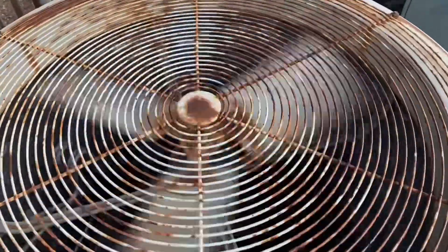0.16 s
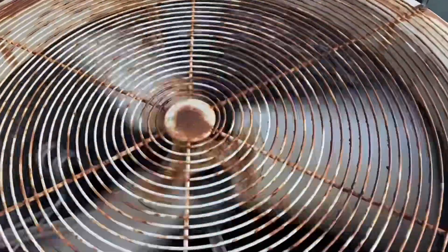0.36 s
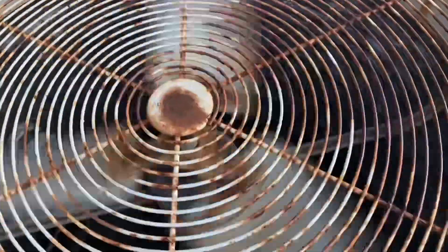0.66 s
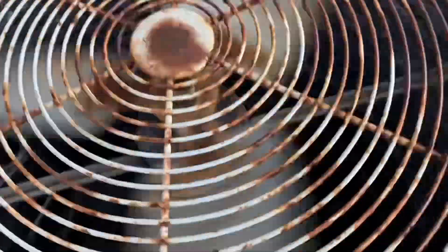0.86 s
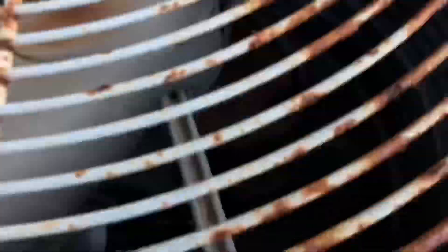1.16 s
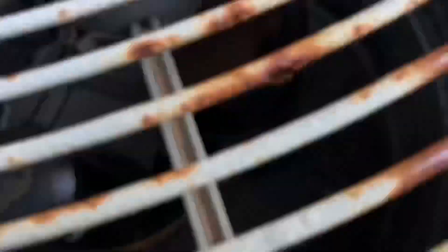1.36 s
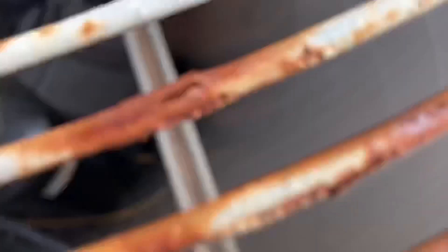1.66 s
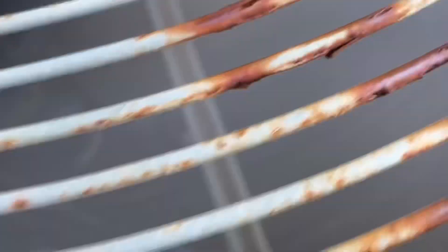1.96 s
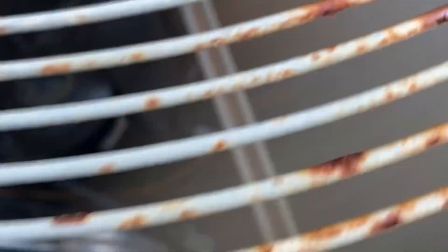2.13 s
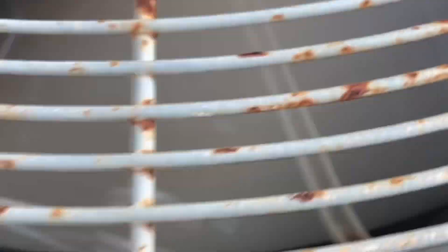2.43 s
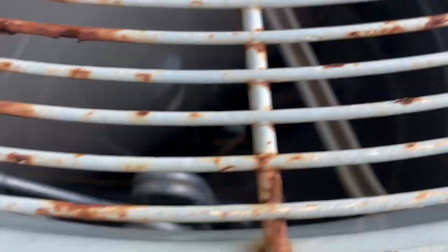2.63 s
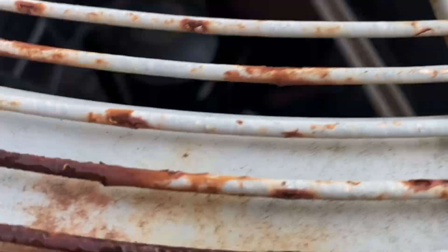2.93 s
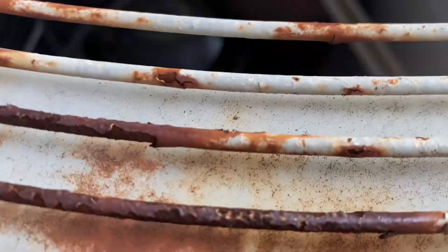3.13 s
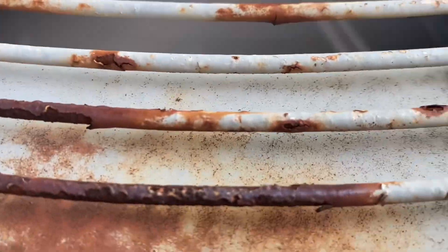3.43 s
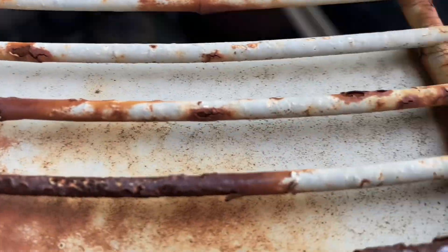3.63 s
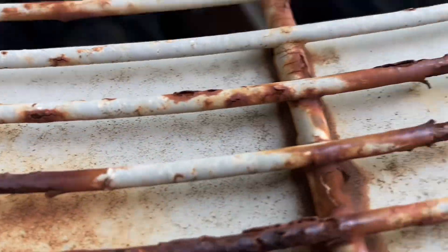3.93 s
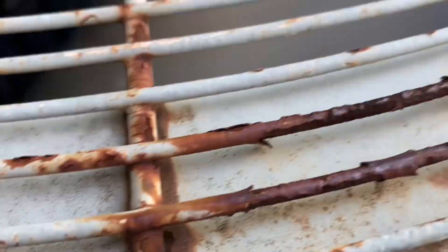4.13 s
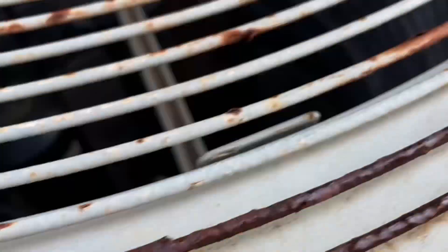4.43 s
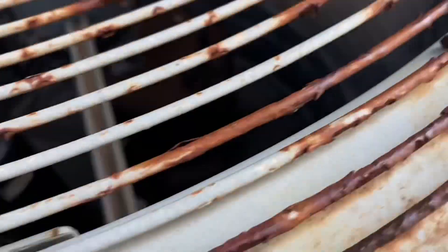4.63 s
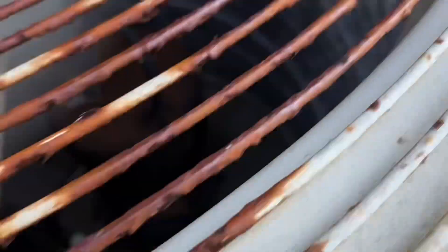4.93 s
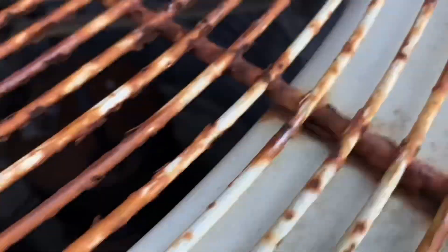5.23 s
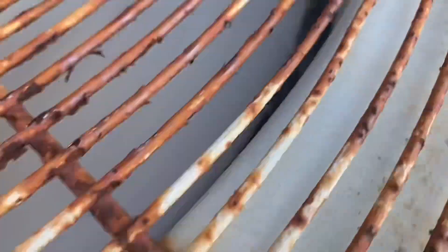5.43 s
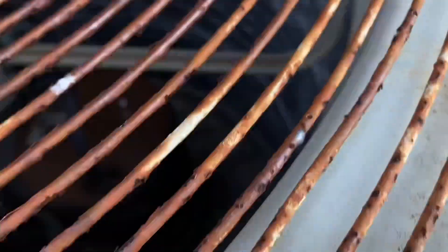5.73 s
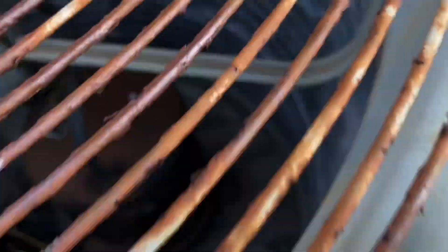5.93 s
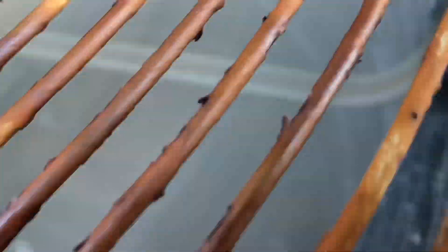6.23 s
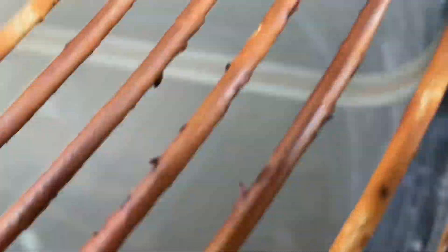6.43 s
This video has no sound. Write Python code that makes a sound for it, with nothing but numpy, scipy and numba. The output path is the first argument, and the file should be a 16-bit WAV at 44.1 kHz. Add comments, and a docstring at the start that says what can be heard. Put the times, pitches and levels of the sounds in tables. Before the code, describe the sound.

Steady heavy fan roar, fluttering rapidly as blades pass, the microphone descending to the grille amid low rumble, wind thumps and compressor hum.

```python
"""Outdoor condenser unit, close up

A phone with two microphone ports starts above the fan hub, comes down to the grille and moves along the rim.
Three blades turn a pressure wave past the ports: cosines at the blade-passing rate and two multiples.
Each passage trails a burst of turbulent wake, made of noise gated by the blade angle, with eddies after it.
The draught buffets, thumps and pops on the ports; air rushes through the grille and sounds through the casing.
Below, the compressor hums on a shaft order while gas hiss, valve rattle and whines come through its shell."""
import sys
import numpy as np
from scipy import signal
from scipy.fft import rfft, irfft, next_fast_len
from scipy.io import wavfile
from scipy.ndimage import uniform_filter1d, minimum_filter1d
from numba import njit

SR = 44100
rng = np.random.default_rng(int(sys.argv[2]) if len(sys.argv) > 2 else 0)


def generate_wav(sig):
    """Save sig (samples, or channels by samples) to the path in sys.argv[1] as 16-bit PCM at SR."""
    pcm = np.round(np.clip(np.atleast_2d(sig).T, -1, 1) * 32767).astype(np.int16)
    wavfile.write(sys.argv[1], SR, pcm)


N = 290619
PORTS = np.array([[0], [1]])  # rows: left, right


def undb(db):
    """Amplitude of a level in dB."""
    return 10 ** (np.asarray(db) / 20)


def unit(x):
    """Scale to rms 1."""
    return x / np.sqrt(np.mean(x ** 2))


def curves(table):
    """Columns of a table whose first column is time in s, one value a sample."""
    s, *columns = np.transpose(table)
    return [np.interp(np.arange(N) / SR, s, column) for column in columns]


def over_hz(table, hz):
    """A table read on a log-frequency axis."""
    table_hz, values = np.transpose(table)
    return np.interp(np.log(hz), np.log(table_hz), values)


@njit
def svf(x, hz, width):
    """State-variable band-pass, gain 1 at the centre."""
    y, band, low = np.empty(len(x)), 0., 0.
    g, k = np.tan(np.pi * hz / SR), width / hz
    for i in range(len(x)):
        v = (band + g * (x[i] - low)) / (1 + g * (g + k))
        band, low, y[i] = 2 * v - band, low + 2 * g * v, k * v
    return y


def walk(rate):
    """Random levels held 1 / rate s and slewed twice; spread near 1."""
    k = int(SR / rate)
    held = np.repeat(rng.standard_normal(N // k + 1), k)
    return 1.3 * uniform_filter1d(uniform_filter1d(held, k), k)[:N]


# how far the ports share a sound, by frequency: pitch_hz, share of the bass likeness
LIKENESS = [(60, 3.3), (400, 1.27), (1200, 1.06), (2400, 0.034), (4400, 1.23), (8000, 0.053), (15000, 0.23)]
AIR_ALIKE = .58  # bass likeness of the ports for sound that comes through the air, 0-1


def air(colour, alike, sway, count=1):
    """Two-port noise in slices of a spectrum, count to the octave; sway(hz) gains each slice; rms near 1."""
    size = next_fast_len(N, True)
    hz = np.maximum(np.arange(size // 2 + 1) * SR / size, 1)
    lowest, highest = np.array(colour)[[0, -1], 0]
    gain = undb(over_hz(colour, hz)) * (hz > .7 * lowest) * (hz < 1.4 * highest)
    gain = gain / np.sqrt(np.mean(gain ** 2))
    noise = rfft(rng.standard_normal((2, size))) * gain
    out = np.zeros((2, N))
    for centre in 31.25 * 2 ** np.arange(0, 10, 1 / count):
        if not lowest / 2 < centre < highest * 2:
            continue
        window = np.cos(np.pi / 2 * np.clip(count * np.log2(hz / centre), -1, 1)) ** 2
        shared = np.clip(alike * over_hz(LIKENESS, centre), 0, .98)
        # a common and an opposed part, balanced to give the likeness
        balance = np.sqrt([1 + shared, 1 - shared]).reshape(2, -1)
        mid, side = irfft(noise * window, size)[:, :N] * balance
        out += np.array([mid + side, mid - side]) * sway(centre) / np.sqrt(2)
    return out


# how the microphone comes down: start_s, nearness to the grille (0-1)
DESCENT = [(0, 0), (.5, 0.1), (.9, 0.5), (1.2, 0.83), (6.6, 1)]


def nearness():
    """Closeness of the microphone to the grille: 0 far above, 1 at it."""
    return np.clip(curves(DESCENT)[0], 0, 1)


# air heard along the microphone's way: start_s, wake_db, rush_db, air_left_minus_right_db,
# buffet_left_minus_right_db, wake_brightness_db_per_octave
AIR_ON_THE_WAY = [(0, -27.5, -22, 0.2, -0.5, 0.5), (.4, -24.5, -20, 0.7, -1, -0.5),
                  (1.0, -22, -17, 0.3, 1, -2), (1.35, -24.5, -21.5, 1.5, -1, 1.5),
                  (1.6, -23, -24.5, 0.5, 3, 0.7), (2.2, -30, -25, 2.5, 3, 0.5),
                  (2.8, -35.5, -28, 2.5, -1.5, -3), (3.4, -38, -26.5, 4, 1.5, -1),
                  (4.0, -39.5, -28, 3.5, -2, -8), (4.6, -36.5, -27.5, 4.5, -0.5, -6.5),
                  (5.2, -37, -30.5, 4.5, 0, 2), (5.7, -36.5, -25.5, 6, 0.5, -3),
                  (6.15, -33, -27.5, 4.5, -1, 4), (6.6, -29.5, -25.5, 5.5, -5, 3)]
WAKE_REF_DB = -30


def wake_level_db():
    """Strength of the blade wake where the microphone is."""
    return curves(AIR_ON_THE_WAY)[0]


def layer_db(layer):
    """Level of a layer from the microphone's nearness and the strength of the wake where it is."""
    far_db, near_db, per_wake = layer
    return far_db + nearness() * (near_db - far_db) + per_wake * (wake_level_db() - WAKE_REF_DB)


# where the microphone is round the hub: start_s, bearing_deg
BEARING = [(0, 25.2), (1.2, 23.5), (2.1, 5.4), (2.7, -12), (3.3, -21), (3.9, -17), (4.5, -5), (4.8, 15),
           (5.4, 38), (5.7, 47), (6.3, 56), (6.6, 57)]
BLADES, BLADE_HZ = 3, 41.1  # blade passages a second past a microphone at rest


def blade_angle():
    """Phase of the blade passages (radians), shifted as the microphone moves round the hub."""
    bearing, = curves(BEARING)
    return 2 * np.pi * BLADE_HZ * np.arange(N) / SR + BLADES * np.radians(bearing)


WAKE_LEAD = 1.3  # phase of the wake in a blade passage, radians
CHOP_WAKE_DB = (-40, -27)  # wake levels between which the chopping sets in


def chopped(angle, depth):
    """Gain of a sound that the blades cut across, most near the grille in a strong wake; rms 1."""
    depth = depth * nearness() * np.interp(wake_level_db(), CHOP_WAKE_DB, (0, 1))
    return np.exp(depth * np.cos(angle + WAKE_LEAD)) / np.sqrt(np.i0(2 * depth))


# compressor below: start_s, hum_db on the fifth shaft order, then ring_db of each of the five shell modes
PUMP = [(0, -26.5, -37.5, -49, -51, -53, -55), (1.05, -23, -35, -41, -49, -55, -55),
        (1.3, -28.5, -37, -46, -56, -59, -46), (1.8, -33, -37, -48, -49, -50, -48),
        (2.2, -27.5, -39.5, -47, -52, -56, -47), (2.5, -31.5, -39, -42, -46, -50, -50),
        (2.9, -29, -45, -47, -50, -51, -52), (3.5, -36, -67, -47, -76, -64, -60),
        (4.05, -30.5, -49, -48.5, -64, -66, -58), (4.4, -31, -41.5, -53, -52, -55, -50.5),
        (4.9, -32, -43, -51, -54, -50.5, -50), (5.4, -28, -42, -50, -54, -50.5, -53.5),
        (5.9, -50, -38.5, -48.5, -48, -52, -52), (6.2, -48, -40, -46, -50, -51, -46.5),
        (6.6, -43, -43, -45, -54, -56, -49)]
# modes of the steel shell, each rung through two passes: pitch_hz, width_hz of a pass, valve_buzz_db against the gas hiss
SHELL = [(2340, 620, -15), (3720, 380, -7), (4620, 450, -5), (5150, 550, -2), (7400, 1700, -8)]
# how deeply the passing blades chop each shell mode on its way up: depth
SHELL_CHOP = (1.6, .9, .6, .3, .1)
# whines through each shell mode, one list a mode: shaft_order, level_db over the mode's ring
WHINE = [
    [],
    [(64, -9), (66, -11), (68, -10)],
    [(80, -9), (84, -12)],
    [(87, -12), (89, -13), (91, -10), (92, -10), (97, -14), (99, -14)],
    [(139, -21)],
]
SHAFT_HZ = 56.82
HUM_WAVER_DB, HUM_WAVER_RAD = 2, .4
WHINE_WAVER_DB, WHINE_WAVER_RAD = 3, .5


def compressor(angle):
    """A wavering hum; gas hiss and the same valve rattle every turn ring the steel shell; shaft orders whine."""
    hum_db, *ring_db = curves(PUMP)
    turns = SHAFT_HZ * np.arange(N) / SR
    rattle = rng.standard_normal(780) * np.exp(-np.arange(780) / SR / .008)
    each_turn = np.diff(np.floor(turns), prepend=0)
    buzz = unit(np.convolve(each_turn, rattle)[:N])
    hum = np.sqrt(2) * np.cos(2 * np.pi * 5 * turns + HUM_WAVER_RAD * walk(12))
    out = undb(hum_db + HUM_WAVER_DB * walk(8)) * hum
    for (hz, width, buzz_db), db, chop, orders in zip(SHELL, ring_db, SHELL_CHOP, WHINE):
        hz, width = float(hz), float(width)
        # hiss partly shared by the two ports
        hiss = rng.standard_normal(N) + .54 * rng.standard_normal((2, N))
        struck = undb(buzz_db) * buzz + hiss
        ring = np.array([svf(svf(port, hz, width), hz, width) for port in struck])
        out = out + undb(db) * unit(ring) * chopped(angle, chop)
        for order, over_db in orders:
            whine = np.sqrt(2) * np.cos(2 * np.pi * order * turns + WHINE_WAVER_RAD * walk(6))
            out = out + undb(db + over_db + WHINE_WAVER_DB * walk(2)) * whine
    return out


# spectrum of the air heard through the casing near the rim: pitch_hz, level_db per Hz (relative)
CASING = [(500, 4), (1180, 9.5), (1400, -3.5), (1750, -23), (2950, -5.5), (4300, -9), (6000, -10),
          (8000, -35.5), (11000, -6.5), (15500, -32)]
# casing level: far_db, near_db, db per dB of wake
CASING_AIR = (-33, -31, 0.53)
CASING_CHOP, CASING_CHOP_TOP_HZ = 1.1, 1500  # depth of the chopping, and the top of the slices it reaches


def casing_air(angle):
    """Air noise heard through the casing, its colours wavering; the blades chop its low part."""
    chop = chopped(angle, CASING_CHOP)

    def sway(hz):
        waver = undb(.4 * walk(9.5))
        return waver * chop if hz < CASING_CHOP_TOP_HZ else waver

    return undb(layer_db(CASING_AIR)) * air(CASING, AIR_ALIKE, sway)


# spectrum of the rush through the grille: pitch_hz, level_db per Hz (relative)
RUSH = [(30, -28), (100, -33), (150, -15), (300, -1), (740, -5), (1200, -10.5), (2600, -20), (4500, -28),
        (8000, -28.5), (11000, -95), (15500, -34)]


def grille_rush(gust):
    """Broad noise of air through the grille, rising and falling slightly with the draught."""
    rush_db = curves(AIR_ON_THE_WAY)[1]
    return undb(rush_db) * air(RUSH, AIR_ALIKE, lambda hz: undb(.97 * gust))


# gusts in the draught: centre_s, rise_db of the buffeting, half_length_s
GUSTS = [(0, 10, 0.052), (1.3, 2.5, 0.17), (3.5, 4, 0.68), (5.155, 2.5, 0.14), (6.456, 4.5, 0.16)]


def gusts_db():
    """Bell-shaped swells of the draught."""
    t = np.arange(N) / SR
    return sum(db * np.exp(-((t - s) / half) ** 2) for s, db, half in GUSTS)


# spectrum of the draught on the ports: pitch_hz, level_db per Hz (relative)
BUFFET = [(25, -19), (35, -11.5), (55, 0), (80, -.5), (115, -2.5), (180, -10), (350, -20)]
# buffeting level: far_db, near_db, db per dB of wake
BUFFET_AIR = (-16, -13.5, 0.079)
BUFFET_ALIKE = .34  # bass likeness of the buffeting on the two ports, 0-1


def buffeting(gust):
    """Low rumble of the draught on the two ports, swelling with the gusts."""
    pan_db = curves(AIR_ON_THE_WAY)[3]
    level_db = layer_db(BUFFET_AIR) + gusts_db() + np.array([pan_db, -pan_db]) / 2
    return undb(level_db) * air(BUFFET, BUFFET_ALIKE, lambda hz: undb(.6 * gust + 1.2 * walk(25)))


# small eddies across the ports: start_s, peak_db, first_pitch_hz, length_s,
# left_share of the right port's swing (negative: opposite sign)
POPS = [(0.344, -10, 650, 0.028, -0.32), (0.375, -16, 540, 0.029, -1.2), (2.189, -11, 1570, 0.0078, -1),
        (2.248, -12, 1480, 0.008, -1.1)]


def pops():
    """Eddies that pop across the ports: short swings whose pitch falls fast."""
    out = np.zeros((2, N))
    for s, db, hz, length, left in POPS:
        t = np.arange(int(length * SR)) / SR
        cycles = hz * length / 6 * np.log(1 + 6 * t / length)
        shape = np.minimum(t / .00068, 1) * (1 - t / length) ** .5
        swing = undb(db) * np.sin(2 * np.pi * cycles) * shape
        start = int(s * SR)
        out[:, start:start + len(t)] += swing * np.array([[left], [1]])
    return out


# largest eddies on both ports: time_s (a fifth of the way in), peak_db of the swing, pitch_hz about midway
THUMPS = [(2.42, -12, 239), (2.944, -12.5, 252), (3.041, -11.5, 340), (3.079, -14, 317), (3.14, -6.5, 415),
          (3.189, -12, 296), (3.264, -9.5, 390), (3.411, -7, 382), (3.331, -21, 1100), (3.437, -24, 820),
          (3.535, -14, 303), (3.551, -7.5, 306), (4.114, -13, 319), (5.015, -12, 299), (6.015, -19, 604),
          (6.038, -9, 304), (6.11, -18, 600), (6.258, -21, 635), (6.354, -16, 595), (6.403, -20, 730),
          (6.421, -13, 276), (6.474, -12, 700)]
THUMP_S = .01977  # whole length
THUMP_ROUGH_DB, THUMP_ROUGH_HZ = -6.5, (200, 1100)  # rough air: rms against the swing's peak, band


def thumps():
    """The largest eddies thump: a few cycles that swell, break and sag in pitch, torn by rough air."""
    out = np.zeros((2, N))
    t = np.arange(int(THUMP_S * SR)) / SR
    band = signal.butter(5, THUMP_ROUGH_HZ, "band", fs=SR, output="sos")
    rough = undb(THUMP_ROUGH_DB) * unit(signal.sosfilt(band, rng.standard_normal((2, N))))
    for (s, db, hz), start_cycles in zip(THUMPS, rng.random(len(THUMPS))):
        first = int((s - THUMP_S / 5) * SR)
        at = slice(first, first + len(t))
        swing = np.sin(2 * np.pi * (start_cycles + hz * t * (1.2 - 10 * t))) + rough[:, at]
        out[:, at] += undb(db) * swing * np.hanning(len(t))
    return out


# when a wake burst meets the ports: start_s, right_port_early_deg of a passage at 1 kHz
WAKE_TIMING = [(0, 40), (1.2, 60), (2.7, 55), (4.2, 45), (5.2, 30), (6.6, 20)]
# how a burst slants with pitch: start_s, left_early_deg per octave, right_early_deg per octave
WAKE_SLANT = [(0, -5, -20), (5, -5, -25), (6.1, -22, -30), (6.6, -22, -30)]
BURST_JITTER_RAD = .22  # each colour of a burst comes a little early or late


def bursts(angle, sharp, scatter_db, colour_db, tilt_db=0):
    """Gain of noise that comes once a blade passage; each burst has its own size, colour and timing."""
    early = np.radians(curves(WAKE_TIMING)[0]) * PORTS
    slant = np.radians(curves(WAKE_SLANT))
    passage = (angle + WAKE_LEAD) / (2 * np.pi)
    count = np.arange(-1, passage.max() + 2)
    size = rng.standard_normal(len(count))
    # rms of the bursts' shape, for an even level at any sharpness
    mean = np.sqrt(np.interp(sharp, np.linspace(0, 3, 30), np.i0(np.linspace(0, 6, 30))))

    def gain(hz):
        octave = np.clip(np.log2(hz / 1000), -1, 2)
        burst_db = scatter_db * size + colour_db * rng.standard_normal(len(count))
        db = np.interp(passage, count, burst_db) + tilt_db * octave
        late = BURST_JITTER_RAD * np.interp(passage, count, rng.standard_normal(len(count)))
        phase = 2 * np.pi * passage + early + slant * octave - late
        return np.exp(sharp * np.cos(phase)) * undb(db) / mean

    return gain


# spectrum of the eddies: pitch_hz, level_db per Hz (relative)
EDDIES = [(120, -6.5), (250, 2), (450, -2), (800, -7), (1400, -32.5)]
# eddy level: far_db, near_db, db per dB of wake
EDDY_AIR = (-32.5, -20.5, 0.45)
EDDY_GUST_SHARE = .59  # of the gusts' rise in dB
EDDY_LATE = .9  # radians after the wake


def wake_eddies(angle):
    """Low, uneven swells of turbulence that follow each wake and swell with the gusts."""
    level_db = layer_db(EDDY_AIR) + EDDY_GUST_SHARE * gusts_db()
    swells = bursts(angle - EDDY_LATE, sharp=.7, scatter_db=2.2, colour_db=2.)
    return undb(level_db) * air(EDDIES, AIR_ALIKE, swells)


# spectrum of the wake: pitch_hz, level_db per Hz (relative)
WAKE = [(400, -5.5), (800, 8), (1500, 4), (2500, -4), (4000, -15), (8000, -26)]
WAKE_SHARP = (.5, 2.0)  # sharpness of the bursts far above the grille, at the grille


def blade_wake(angle):
    """A burst of turbulent noise behind each blade, sharper close to the grille."""
    tilt_db = curves(AIR_ON_THE_WAY)[4]
    sharp = WAKE_SHARP[0] + nearness() * (WAKE_SHARP[1] - WAKE_SHARP[0])
    passing = bursts(angle, sharp, scatter_db=.3, colour_db=3., tilt_db=tilt_db)
    return undb(wake_level_db()) * air(WAKE, AIR_ALIKE, passing, count=2)


# turning field at the ports: start_s, tone_left_db, tone_right_db, octave_left_db, octave_right_db
FIELD = [(0, -36, -36, -34, -36), (.75, -30, -36, -32, -34), (1.1, -13, -22, -15, -23),
         (1.45, -14, -15, -7.5, -12), (1.85, -12.5, -15, -9, -17), (2.25, -13, -16.5, -11, -18),
         (2.65, -14, -17, -14, -18), (3.3, -16, -17, -14.5, -18), (3.85, -17, -18.5, -16, -21),
         (4.45, -16, -17, -14.5, -18), (5.05, -15.5, -16, -14.5, -17), (5.6, -16, -16, -13.5, -17),
         (6.25, -13.5, -13.5, -9.5, -13.5), (6.6, -13, -13, -9, -13)]
OCTAVE_LEAD, THIRD_LEAD = 2.6, .9  # shape of one blade passage, radians
TONE_BEHIND_DEG, OCTAVE_BEHIND_DEG = 10, 6  # right port behind left
OCTAVE_BEHIND_DEG_PER_DB = 2.1  # the steep front slants more across the ports in a strong wake
THIRD_OVER_DB = 4  # third order over twice the octave's dB level


def blade_wave(angle):
    """The pressure field that turns with the blades; it steepens close up, so the third order grows fastest."""
    slant = OCTAVE_BEHIND_DEG + OCTAVE_BEHIND_DEG_PER_DB * np.maximum(wake_level_db() - WAKE_REF_DB, 0)
    tone_angle = angle - BLADES * np.radians(PORTS * TONE_BEHIND_DEG)
    octave_angle = angle - BLADES * np.radians(PORTS * slant)
    tone_db, octave_db = np.reshape(curves(FIELD), (2, 2, N))
    octave_db = octave_db + .8 * np.array([walk(9), walk(9)])
    # the steep front arrives unevenly
    octave_angle = octave_angle + .1 * walk(11) + .06 * np.array([walk(11), walk(11)])
    tone = undb(tone_db) * np.cos(tone_angle)
    octave = undb(octave_db) * np.cos(2 * octave_angle + OCTAVE_LEAD)
    third_angle = angle + tone_angle + octave_angle + THIRD_LEAD
    third = undb(2 * octave_db + THIRD_OVER_DB) * np.cos(third_angle)
    return np.sqrt(2) * (tone + octave + third)


PAN_TOP_HZ = 6000  # top of the band that leans left or right


def scene():
    """All layers at the two ports; sound through the air leans left or right below PAN_TOP_HZ."""
    angle = blade_angle()
    gust = walk(10)  # shared by the rush and the buffeting
    through_air = compressor(angle) + casing_air(angle) + grille_rush(gust)
    through_air = through_air + wake_eddies(angle) + blade_wake(angle)
    pan_db = curves(AIR_ON_THE_WAY)[2]
    pan = undb(np.array([pan_db, -pan_db]) / 2)
    body = signal.sosfiltfilt(signal.butter(2, PAN_TOP_HZ, fs=SR, output="sos"), through_air)
    at_ports = buffeting(gust) + pops() + thumps()
    return at_ports + through_air + body * (pan - 1) + blade_wave(angle)


CEILING, LIMITER_S, BASS_HZ = .99, .012, 200  # peak amplitude, reach of the ducking, top of the ducked bass
TOP_HZ = 15900


def record(dry):
    """The phone's limiter ducks the bass under each peak, what is left over is rounded, and the top is cut."""
    size = int(LIMITER_S * SR)
    bass = signal.sosfiltfilt(signal.butter(2, BASS_HZ, fs=SR, output="sos"), dry)
    room = minimum_filter1d(np.minimum(CEILING / np.abs(dry), 1) ** 1.5, size=2 * size + 1)
    limited = dry - bass * (1 - uniform_filter1d(room, size=size))
    rounded = limited / (1 + (np.abs(limited) / CEILING) ** 8) ** (1 / 8)
    return signal.sosfilt(signal.ellip(8, .2, 70, TOP_HZ, fs=SR, output="sos"), rounded)


dry = scene()
out = record(dry)
generate_wav(out)
```